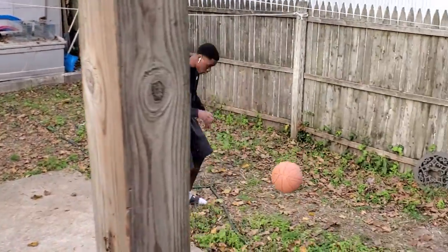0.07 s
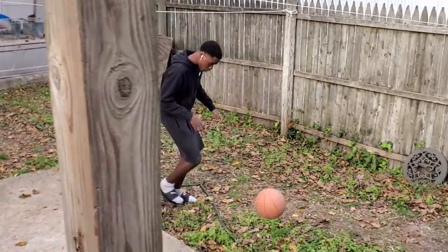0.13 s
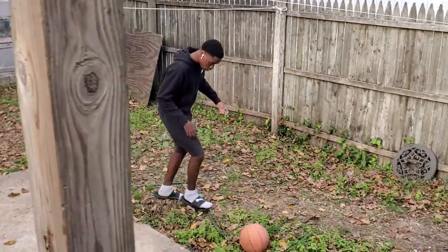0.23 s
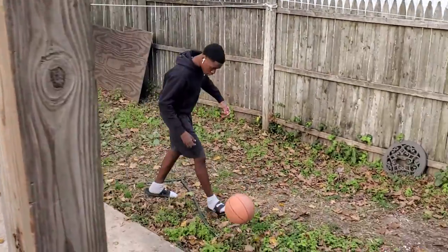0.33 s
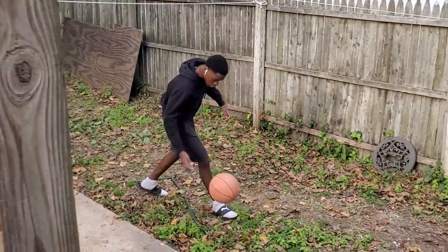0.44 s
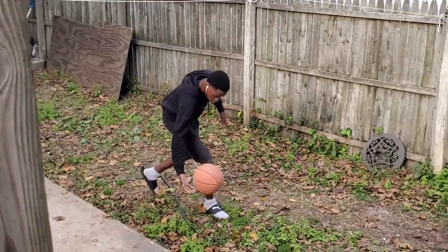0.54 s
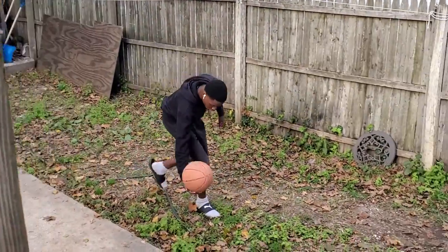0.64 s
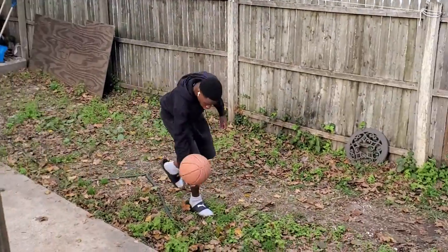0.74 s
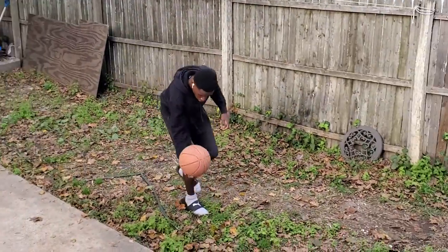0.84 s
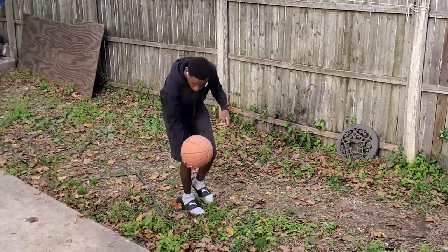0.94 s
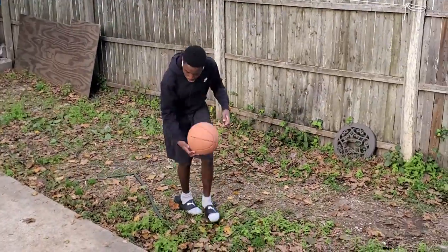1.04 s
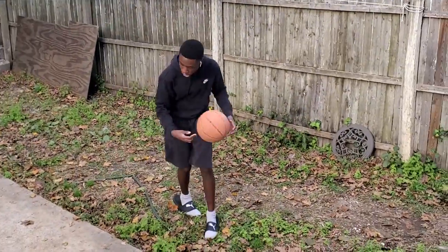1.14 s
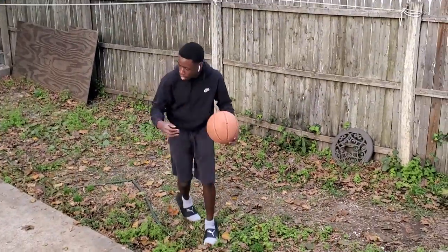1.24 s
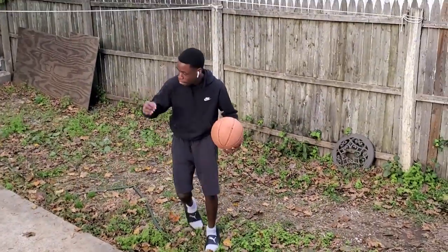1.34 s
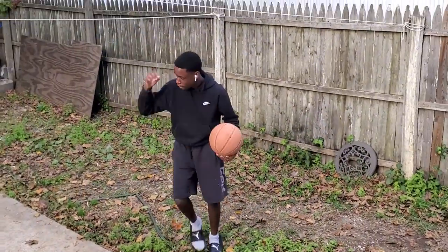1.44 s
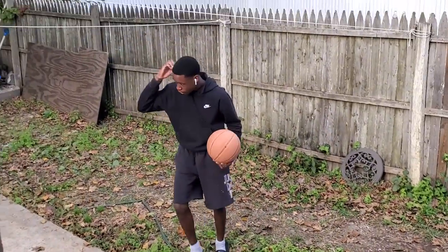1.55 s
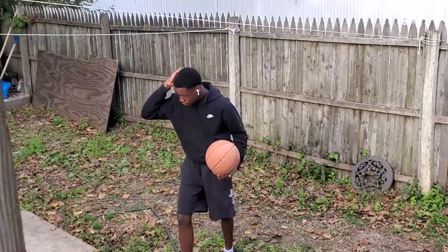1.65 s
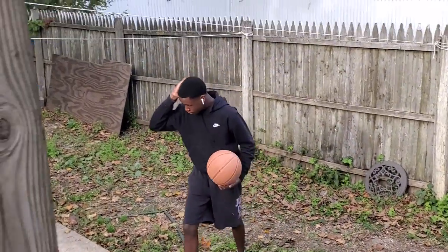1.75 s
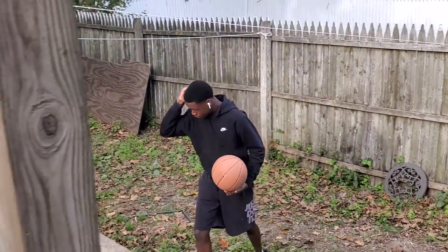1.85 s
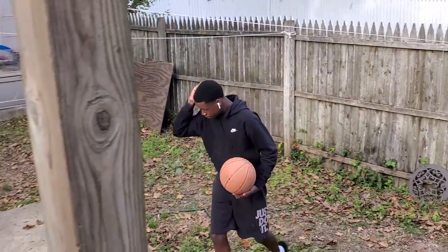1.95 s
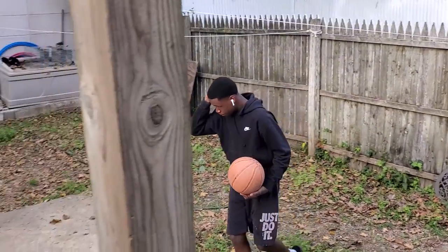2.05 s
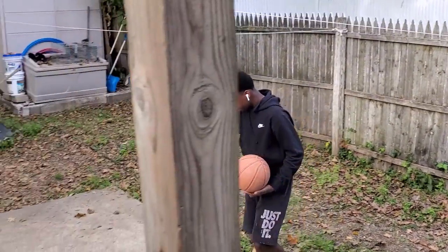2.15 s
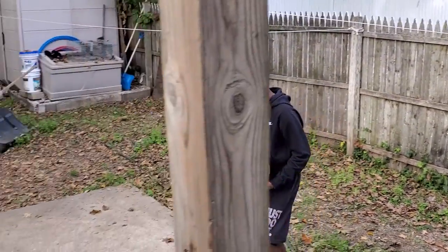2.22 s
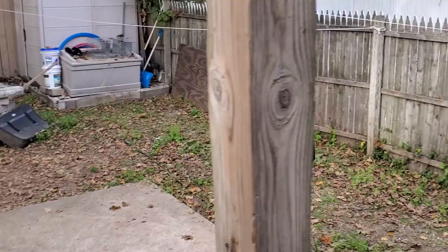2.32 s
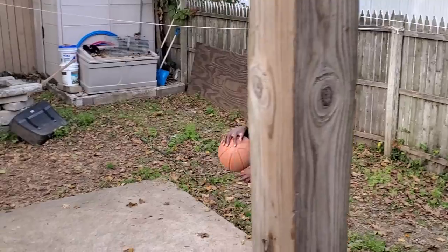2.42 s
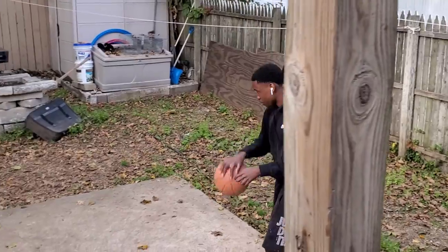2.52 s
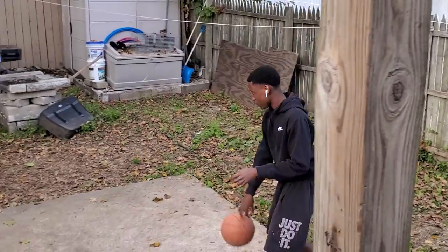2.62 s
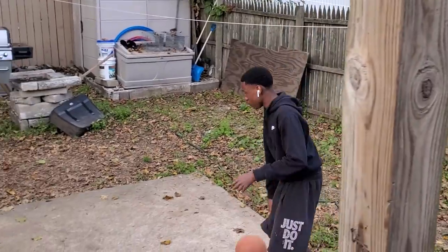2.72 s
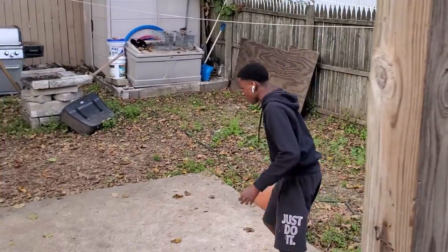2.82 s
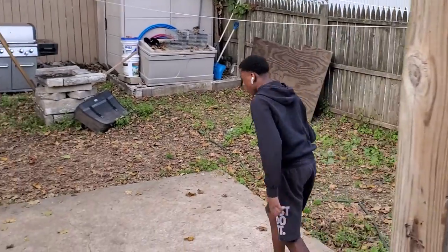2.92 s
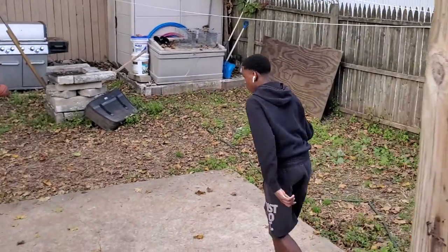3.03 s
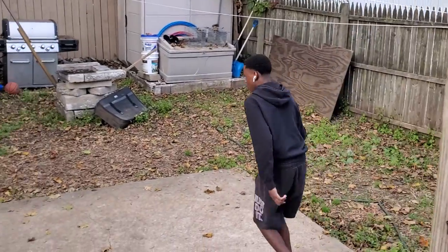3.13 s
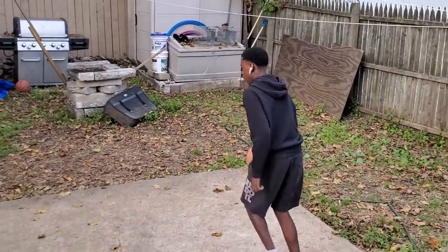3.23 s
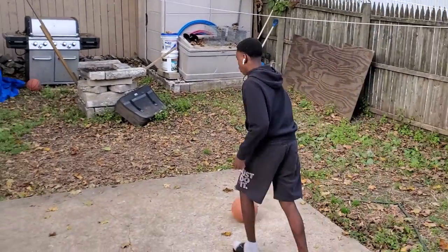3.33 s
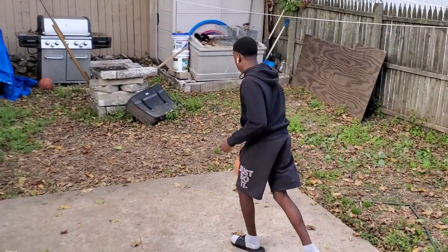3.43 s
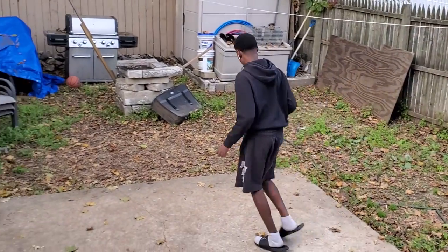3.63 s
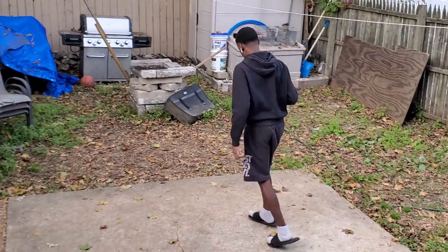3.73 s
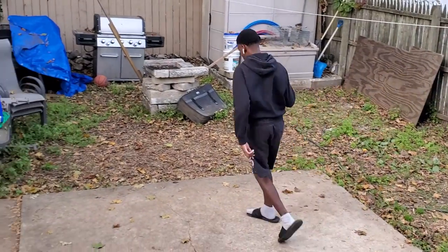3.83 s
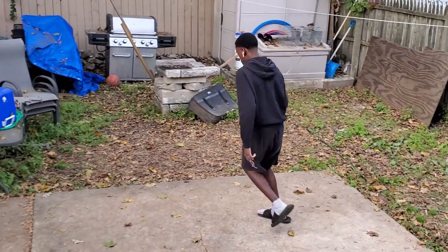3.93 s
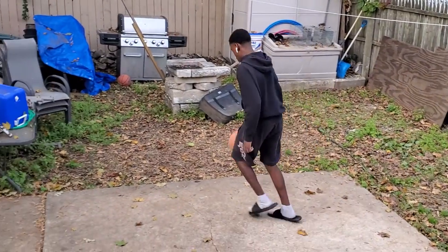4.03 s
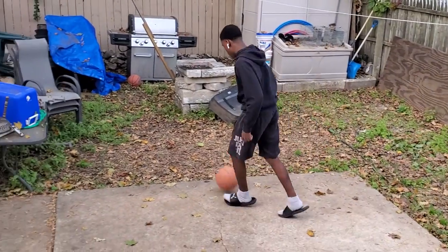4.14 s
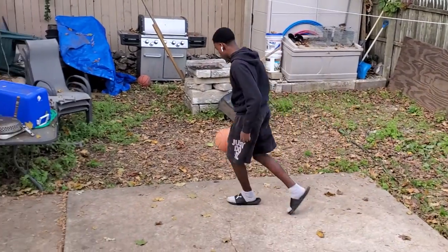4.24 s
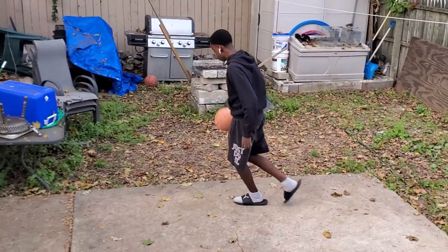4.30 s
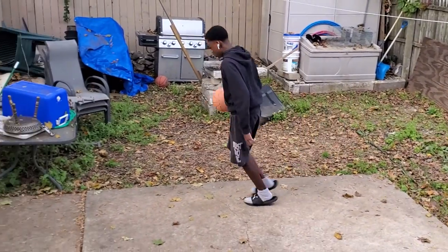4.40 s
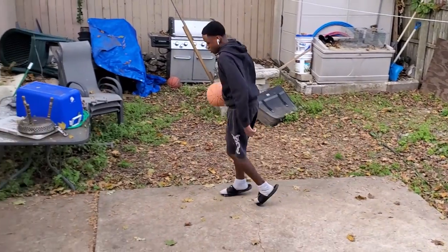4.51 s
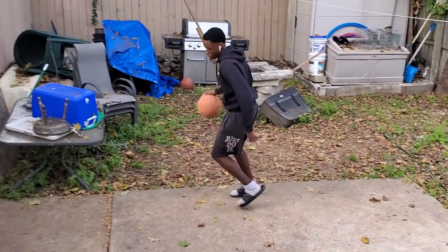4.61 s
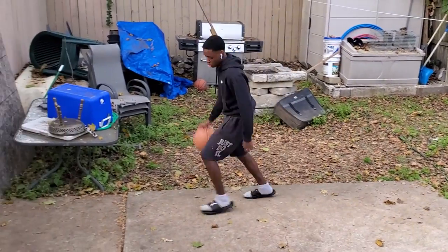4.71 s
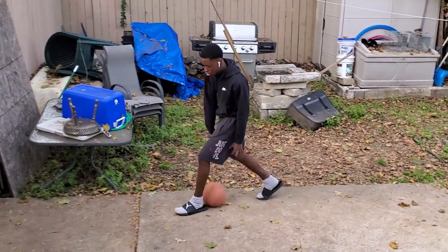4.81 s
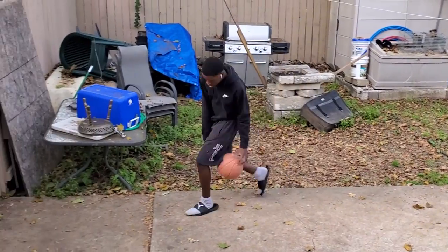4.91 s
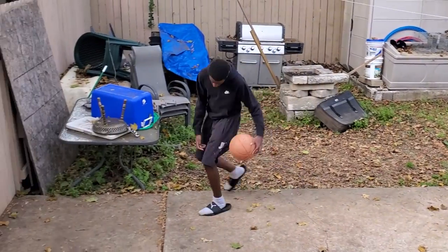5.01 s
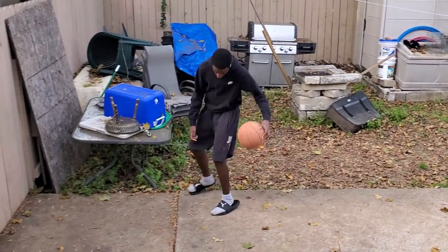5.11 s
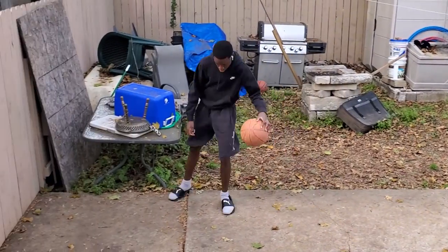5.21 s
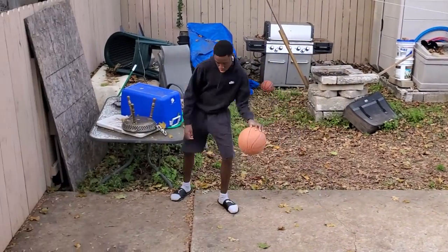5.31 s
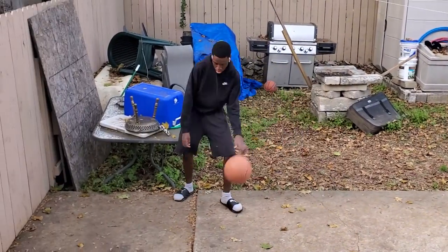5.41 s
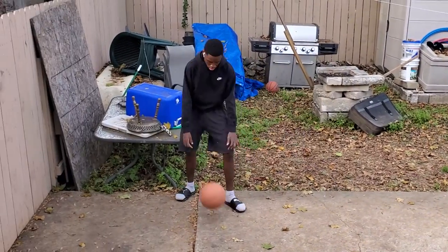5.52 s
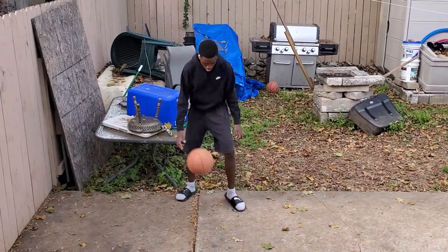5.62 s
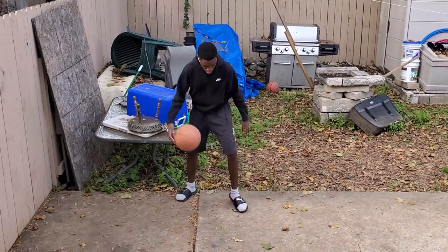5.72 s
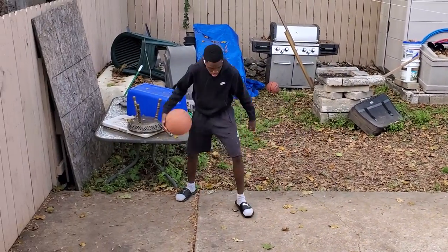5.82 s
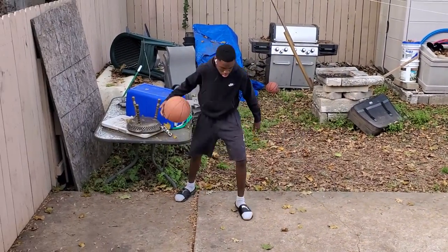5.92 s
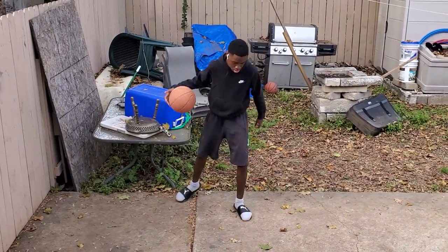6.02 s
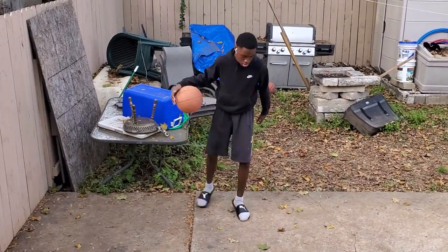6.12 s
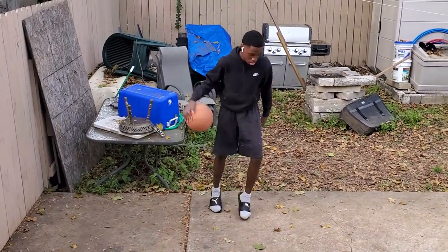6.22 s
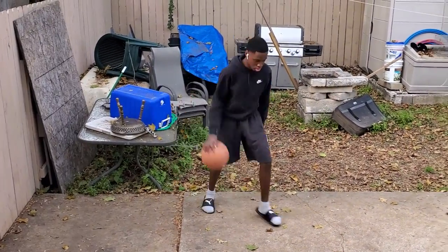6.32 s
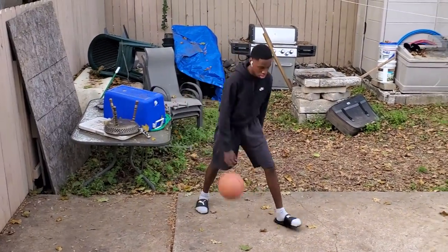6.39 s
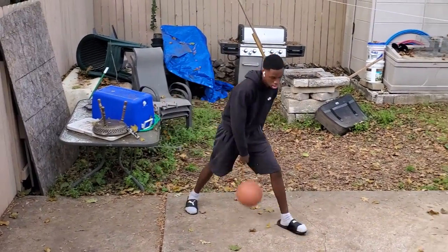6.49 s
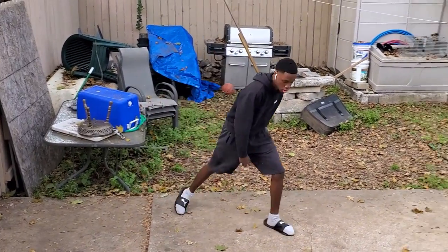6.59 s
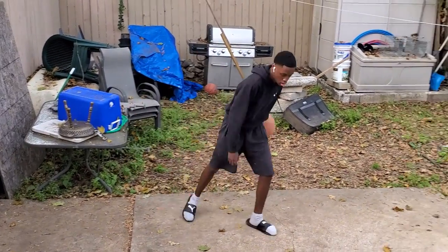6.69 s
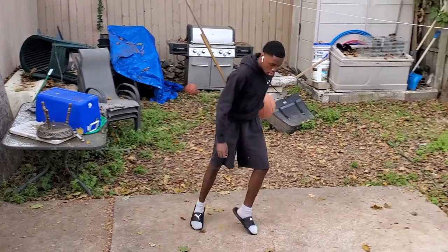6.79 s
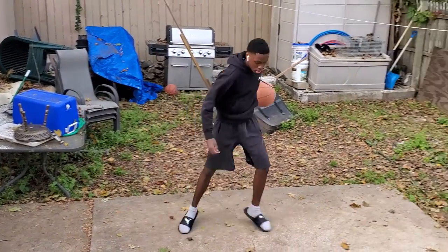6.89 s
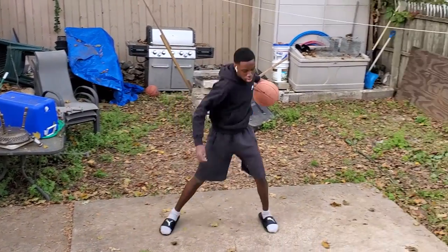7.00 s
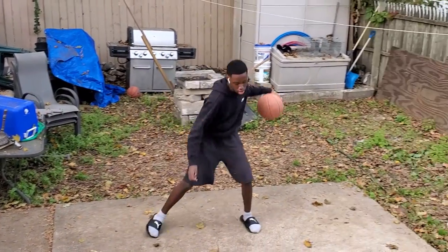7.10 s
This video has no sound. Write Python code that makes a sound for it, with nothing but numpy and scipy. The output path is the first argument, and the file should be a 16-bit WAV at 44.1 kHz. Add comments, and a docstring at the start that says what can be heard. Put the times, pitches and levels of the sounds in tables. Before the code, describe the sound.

Sandals crunch through dry leaves, then a basketball is dribbled six times on a concrete backyard patio, with faint traffic far away.

```python
"""A fenced backyard, a pair of microphones close to a basketball player, traffic rumbling far away.
First sandals crunch through dry leaves on the lawn, where the ball lands once, dully, and is fetched.
From about three seconds it is dribbled six times on the concrete patio, sandals scuffing in between.
Each bounce is a slap, a low thump and the ring of the air inside the ball, thrown back by the fence
and the house walls."""
import sys
import numpy as np
from scipy import signal
from scipy.fft import rfft, irfft
from scipy.io import wavfile

SR = 44100
rng = np.random.default_rng(int(sys.argv[2]) if len(sys.argv) > 2 else 0)


def bounce(signal):
    """Save signal as a 16-bit WAV file at the path given by the first command-line argument."""
    frames = np.transpose(np.atleast_2d(signal))
    limited = np.clip(frames, -1, 1)
    pcm = np.round(limited * 32767).astype(np.int16)
    wavfile.write(sys.argv[1], SR, pcm)


N = 315315
TIME = np.arange(N) / SR
AGE = np.arange(SR) / SR  # seconds since a contact

# Spectrum of cracking leaves, twigs and grit. Each row: frequency in Hz, level in dB.
GRIT_SPECTRUM = [(200, -26), (600, -13.5), (1100, -4), (2000, 1), (3000, -2.5), (4200, 7), (5300, 7),
                 (6300, 1), (7300, 4), (9500, -2), (12000, 4), (14500, 6.5), (16000, 2)]


def from_db(db):
    """Decibels to gain."""
    return 10 ** (np.asarray(db) / 20)


def rms_one(x):
    """Scale to rms 1."""
    return x / np.sqrt(np.mean(x ** 2) + 1e-20)


def fade(t60, age=AGE):
    """Exponential decay, 60 dB in t60 seconds."""
    return np.exp(-np.log(1000) * np.maximum(age, 0) / t60)


def waver(per_s):
    """A random drift of spread about 1, with per_s new values a second."""
    knots = rng.standard_normal(200)
    return np.interp(TIME * per_s, np.arange(len(knots)), knots)


def at_hz(points, hz):
    """Read a table on a log-frequency axis."""
    f, value = np.transpose(points)
    return np.interp(np.log(np.maximum(hz, 1)), np.log(f), value)


def passband(x, hz, kind, order=2):
    """Butterworth filter."""
    return signal.sosfilt(signal.butter(order, hz, kind, fs=SR, output="sos"), x + 1e-18)


def colour(x, spectrum, size=8192):
    """Causal (minimum-phase) filter with this spectrum; white noise keeps its power."""
    gain = rms_one(from_db(at_hz(spectrum, np.fft.rfftfreq(size, 1 / SR))))
    cepstrum = irfft(np.log(gain))
    cepstrum[1:size // 2] *= 2
    cepstrum[size // 2 + 1:] = 0
    impulse = irfft(np.exp(rfft(cepstrum)))
    return signal.fftconvolve(x, impulse[None], axes=1)[:, :x.shape[1]]


def pair_noise(apart, size=SR):
    """White noise at the two microphones; apart is the unshared part of the power."""
    return np.sqrt(1 - apart) * rng.standard_normal(size) + np.sqrt(apart) * rng.standard_normal((2, size))


def burst(t60, apart):
    """A short contact noise of unit energy."""
    noise = pair_noise(apart) * fade(t60)
    return noise / np.sqrt(np.sum(noise ** 2) / 2)


def add(out, s, sound):
    """Mix a sound in at s seconds."""
    start = min(max(round(s * SR), 0), out.shape[1])
    part = sound[..., :out.shape[1] - start]
    out[:, start:start + part.shape[-1]] += part


def aimed(sound, s, pan_db=0):
    """From where the player is at time s, sound reaches the right microphone a little after the left."""
    # The path from lawn to patio. Each row: time in seconds, lead of the left microphone in ms.
    left_lead = [(2.2, .46), (2.8, .19), (4.3, .2), (5.3, .02), (6.6, .22)]
    lag = round(np.interp(s, *np.transpose(left_lead)) * SR / 1000)
    left, right = sound * from_db([[pan_db / 2], [-pan_db / 2]])
    return np.array([left, np.pad(right, (lag, 0))[:len(right)]])


def neighbourhood():
    """Far traffic and air: the swelling rumble is shared, the wavering hiss differs at each microphone."""
    # Course of the rumble and of the hiss. Each row: time in seconds, level in dB.
    rumble_levels = [(0.0, -55.5), (0.52, -51.5), (1.65, -56), (2.85, -54.5), (6.83, -48.5), (7.15, -58)]
    hiss_levels = [(0, 2.5), (1, -1), (2, 1.5), (3.3, -1), (4.55, -2.5), (5.55, 2.5), (6, 0.5), (6.55, -1),
                   (7.15, 2)]
    # Spectra of the rumble and of the open air. Each row: frequency in Hz, level in dB.
    rumble_spectrum = [(20, -21), (32, -9.5), (48, 5.5), (70, 4), (100, -4.5), (135, -14.5), (200, -19.5),
                       (500, -53)]
    air_spectrum = [(88, -15.5), (150, 0.5), (264, 0), (348, -3.5), (466, -12), (821, -7), (1450, -17),
                    (1790, -12.5), (2870, -17.5), (4950, -14.5), (6020, -18.5), (9440, -23.5),
                    (15100, -17.5), (16000, -19)]
    swell = from_db(np.interp(TIME, *np.transpose(rumble_levels)) + 2.5)
    rumble = swell * colour(pair_noise(0.014, size=N), rumble_spectrum)
    low_air = passband(pair_noise(0.18, size=N), 333, "low", order=1)
    hiss = passband(pair_noise(1.0, size=N), 430, "high", order=1)
    hiss *= from_db(np.interp(TIME, *np.transpose(hiss_levels)))
    return rumble + from_db(-54) * colour(low_air + hiss, air_spectrum)


def far_wash(left_lead_s=.00045):
    """A soft wash of far traffic swells and sinks at random and reaches the left microphone first."""
    left, right = rms_one(passband(pair_noise(0.21, size=N), (830, 1500), "band"))
    swell = from_db(-58.5 + 4.5 * waver(per_s=2.53))
    return swell * np.array([left, np.roll(right, round(left_lead_s * SR))])


def far_tones(length_s=.25, width_hz=95):
    """Faint distant tones, blurred by their many paths between the houses."""
    # The glides. Each row: start in seconds, first pitch in Hz, last pitch in Hz, level in dB.
    glides = [(0.097, 1344, 1330, -63.5), (0.781, 1186, 1074, -57.5), (5.475, 1240, 1225, -58),
              (6.04, 1346, 1457, -59.5)]
    out = np.zeros((2, N))
    progress = np.minimum(AGE / length_s, 1)
    arch = np.sqrt(np.abs(np.sin(np.pi * progress)))
    for s, start_hz, end_hz, db in glides:
        phase = 2 * np.pi * np.cumsum(start_hz + (end_hz - start_hz) * progress) / SR
        blurred = rms_one(passband(pair_noise(0.95), width_hz, "low") * np.sin(phase))
        add(out, s, from_db(db) * blurred * arch)
    return out


def boom(hz=86.7):
    """The bass of a bounce builds up and rolls on between the houses."""
    bass = rms_one(passband(pair_noise(0.015), [hz / 1.6, hz * 1.14], "band"))
    return bass * fade(1.23) * (1 - fade(0.26))


def yard_tail(build_s, apart_hz):
    """Scatter off fence and clutter: builds, dies band by band, alike at both microphones in the bass."""
    # Decay of the yard. Each row: frequency in Hz, t60 in seconds.
    decay_times = [(60, 0.43), (150, 0.44), (400, 0.22), (1000, 0.4), (2500, 0.33), (5000, 0.36),
                   (9000, 0.16), (15000, 0.13)]
    # Spectrum of the scatter. Each row: frequency in Hz, level in dB.
    yard_spectrum = [(45, 1.5), (75, 16), (120, 3), (240, 0), (330, 0.5), (480, -5.5), (750, -1.5),
                     (1200, -6.5), (1550, -9), (2000, -5), (3500, -11.5), (4900, -13), (8500, -17.5),
                     (16000, -19.5)]
    out = np.zeros((2, SR))
    edges = np.geomspace(30, 17000, 16)
    for low, high in zip(edges, edges[1:]):
        hz = np.sqrt(low * high)
        noise = pair_noise(apart=hz ** 2 / (hz ** 2 + apart_hz ** 2))
        out += passband(noise, [low, high], "band") * fade(at_hz(decay_times, hz))
    return colour(out * (1 - np.exp(-AGE / build_s)), yard_spectrum)


def crunch(rise, length, t60, weight_db, sizzle_db, grains_per_s=5500, rub_db=-3):
    """Leaves and sand crack under a rubbing sole; a heavy step sounds lower, a dry one sizzles."""
    pressure = np.minimum(AGE / rise, 1) * fade(t60, AGE - length)
    sizes = from_db(3.6 * np.minimum(rng.exponential(1, SR), 4.5))
    clumps = from_db(2.5 * waver(per_s=110)[:SR])  # leaves and grains give way in small groups
    cracks = rng.random(SR) < grains_per_s / SR
    grains = rms_one(cracks * sizes * clumps * pair_noise(0.89))
    noise = rms_one(grains + from_db(rub_db) * pair_noise(0.97)) * pressure
    hz = np.geomspace(200, 16000, 90)
    ripple_db = rng.normal(0, 2.7, len(hz))  # each crunch gets its own random, uneven tone colour
    shelves_db = weight_db / (1 + (hz / 3000) ** 2) + sizzle_db / (1 + (10000 / hz) ** 6)
    tone_db = at_hz(GRIT_SPECTRUM, hz) + ripple_db + shelves_db
    return colour(noise, np.column_stack([hz, tone_db]))


def footwork(settle_s=0.4):
    """Sandals swell softly in the leaves and bite quickly on the slab; twigs snap, loose bits settle."""
    # Steps in dry leaves. Each row: start and length in seconds, level and sizzle in dB.
    leaf_steps = [(0.046, 0.029, -43.5, 0), (0.351, 0.084, -35, 2.5), (0.498, 0.17, -43, 0),
                  (1.136, 0.051, -46.5, -1), (1.239, 0.14, -41.5, 4), (1.776, 0.09, -49.5, 5.5),
                  (2.097, 0.11, -36, 5.5), (2.375, 0.091, -30.5, 5.5), (2.558, 0.021, -32.5, 2)]
    # Landings and scuffs. Each row: start, rise and length in seconds, level, weight and sizzle in dB.
    scuffs = [(1.181, 0.0016, 0.0045, -33.5, 4, 2), (1.683, 0.0027, 0.013, -46.5, 18, -5),
              (2.742, .006, .008, -41, -3, -5), (3.112, 0.0089, 0.033, -36, 5, 0),
              (3.429, 0.011, 0.011, -32, -5, 1.5), (3.525, 0.02, 0.039, -30.5, -14, 4),
              (3.958, 0.0046, 0.0054, -34, 8, 1.5), (4.119, .002, .004, -45, -25, -12),
              (4.647, 0.018, 0.052, -34.5, 6, -9), (4.869, 0.057, .1, -37, 19, 10.5),
              (4.928, 0.0069, 0.031, -24, 16, -3), (5.261, 0.0023, 0.02, -35, -10, -22),
              (5.333, 0.045, 0.054, -27, 14, -2), (5.47, .01, 0.19, -56, 8, 0),
              (6.177, 0.0024, .008, -46.5, 13, 0), (6.337, 0.011, 0.045, -36.5, 20, 5.5),
              (6.578, 0.01, 0.051, -36, 12, 6.5), (6.831, 0.028, 0.17, -34.5, 4.5, 0.5),
              (7.091, 0.017, 0.026, -25.5, -1.5, -4)]
    # The loudest snaps of twigs and grit. Each row: start in seconds, level in dB.
    snaps = [(0.6644, -15), (0.792, -21), (0.899, -24), (1.367, -25), (5.265, -12), (5.6695, 2.5),
             (6.8959, -12), (6.9217, -5)]
    out = np.zeros((2, N))
    for s, length, db, sizzle_db in leaf_steps:  # a longer step swells and dies more slowly
        step = crunch(.5 * length, length, t60=0.18 + 2.94 * length, weight_db=9, sizzle_db=sizzle_db)
        add(out, s, aimed(from_db(db) * step, s, pan_db=-1.5))
    for s, rise, length, db, weight_db, sizzle_db in scuffs:
        step = crunch(rise, length, 0.17 + 1.25 * length, weight_db, sizzle_db)
        add(out, s, aimed(from_db(db) * step, s, pan_db=-1.0))
    for s, db in snaps:
        snap = colour(burst(t60=0.0094, apart=0.41), GRIT_SPECTRUM)
        add(out, s, aimed(from_db(db) * snap, s))
    for s, *_ in leaf_steps + scuffs:  # disturbed leaves and grit settle with tiny ticks
        for delay in rng.uniform(0, settle_s, size=3):
            tick_db = rng.normal(-31.5, 1.4)
            tick = colour(burst(t60=0.0055, apart=0.73), GRIT_SPECTRUM)
            add(out, s + delay, aimed(from_db(tick_db) * tick, s))
    return out


def thump(hz, t60, rise):
    """The ball squashes and springs back: a few heavily damped cycles."""
    return np.sin(2 * np.pi * hz * AGE) * fade(t60) * (1 - np.exp(-AGE / rise)) * np.ones((2, 1))


def ball_ring():
    """Every contact excites the modes of the enclosed air with new strengths."""
    # Air modes of the ball. Each row: frequency in Hz, level in dB, t60 in seconds.
    air_modes = [(826, -6, 0.098), (1045, -15, 0.033), (1301, 6.5, 0.035), (1520, -32, 0.09),
                 (1834, -14, 0.26), (2270, -12, 0.047), (2740, -34, 0.79), (3510, -8, 0.06),
                 (4200, -37, .24), (4730, -34, 0.073), (4770, -21, 0.2)]
    out = np.zeros((2, SR))
    for hz, db, t60 in air_modes:
        phase = rng.uniform(0, 2 * np.pi) + rng.normal(0, .5, (2, 1))
        strength = from_db(db + rng.normal(0, 2.5))
        out += strength * np.sin(2 * np.pi * hz * AGE + phase) * fade(t60)
    return out


def shell_knock(shell_hz):
    """The rubber shell rattles briefly, most strongly near one pitch."""
    broad = passband(burst(t60=.12, apart=0.86), [650, 1450], "band")
    narrow = passband(burst(t60=0.14, apart=0.3), [shell_hz / 1.118, shell_hz * 1.02], "band")
    return broad + from_db(2) * narrow


def soft_contacts(lawn_s=.424):
    """The ball lands dully on leaves and earth and is patted by hand and foot."""
    # The bounce on the lawn: levels of thump, earth and crushed leaves in dB.
    lawn_levels = (-2.5, -23, -25)
    # Spectrum of a dull contact, as on earth. Each row: frequency in Hz, level in dB.
    dull_spectrum = [(60, 1.5), (150, -25), (210, -6), (370, 2), (520, -10.5), (850, -5), (1500, -15),
                     (3000, -38), (9000, -34)]
    # Soft touches on the ball. Each row: start in seconds, level in dB.
    pats = [(.32, -46.5), (.766, -45), (2.546, -40.5), (2.576, -41), (3.12, -44.5), (3.961, -47)]
    thump_db, earth_db, leaves_db = lawn_levels
    out = np.zeros((2, N))
    low = aimed(from_db(thump_db) * thump(hz=72, t60=0.059, rise=0.0039), lawn_s)
    add(out, lawn_s + 0.0037, low)
    add(out, lawn_s + 0.015, from_db(-6.5) * low)  # off the fence
    earth = colour(pair_noise(0.25) * fade(0.18) * (1 - fade(0.005)), dull_spectrum)
    add(out, lawn_s, aimed(from_db(earth_db) * earth, lawn_s))
    tail = passband(yard_tail(build_s=0.016, apart_hz=600), 130, "low")
    add(out, lawn_s, from_db(-28) * tail + from_db(-42.5) * boom())
    leaves = crunch(rise=0.014, length=0.019, t60=0.029, weight_db=16.5, sizzle_db=4)
    add(out, lawn_s - .011, aimed(from_db(leaves_db) * leaves, lawn_s))  # the leaves give way first
    for s, db in pats:
        pat = colour(pair_noise(0.31) * fade(0.088), dull_spectrum) + from_db(-4.5) * ball_ring()
        add(out, s, aimed(from_db(db) * pat, s))
    return out


def dribble(far_house_s=.13):
    """Rubber slaps the slab, the shell knocks, the air thumps and rings; wall and far house answer."""
    # Bounces on concrete. Each row: start in seconds, strength, hardness and knock in dB,
    # shell pitch in Hz, left over right in dB, delay of the wall echo in seconds.
    bounces = [(2.855, -17.5, 0.5, 1, 1230, 0.5, 0.014), (3.518, -17, -4.5, 1, 797, -1, 0.017),
               (4.298, -18.5, -2.5, -0.5, 1040, 1.5, .017), (4.9733, -20.5, -1, 5.5, 1020, 4, 0.017),
               (5.67, -23, -4, 0.5, 1450, -5.5, .018), (6.628, -20.5, 2, -1, 1370, 6.5, .016)]
    # Spectrum of rubber on concrete. Each row: frequency in Hz, level in dB.
    slap_spectrum = [(150, -5), (450, -2), (800, 0.5), (1300, -5.5), (1900, 8.5), (2700, -1), (3600, -13.5),
                     (4200, 4), (5200, 1), (6500, -7.5), (9000, -12), (16000, -23)]
    low = from_db(14.5) * thump(hz=76, t60=.062, rise=.002)
    hollow = thump(hz=190.6, t60=0.1, rise=0.011) - thump(hz=246.5, t60=0.088, rise=0.001)
    out = np.zeros((2, N))
    for s, db, hard_db, knock_db, shell_hz, pan_db, wall_s in bounces:
        slap = from_db(30.5 + hard_db) * colour(burst(t60=.004, apart=.25), slap_spectrum)
        knock = from_db(38 + knock_db) * shell_knock(shell_hz)
        ring = from_db(knock_db) * ball_ring()
        flattening = from_db(24.5 + hard_db) * colour(burst(t60=0.0035, apart=0.99), slap_spectrum)
        hit = np.zeros((2, SR))
        add(hit, 0, aimed(slap + knock + from_db(-1.5) * hollow + ring, s, pan_db))
        add(hit, .003, aimed(flattening, s))  # the shell flattens on the slab
        add(hit, .0045, aimed(low, s))
        # The wall throws slap and knock back with left and right swapped, then the thump.
        add(hit, wall_s, from_db(-16.5) * slap[::-1] + from_db(-14.0) * knock[::-1])
        add(hit, wall_s + 0.0032, from_db(-3.0) * low)
        add(hit, .004, yard_tail(build_s=0.00037, apart_hz=404) + from_db(-18) * boom())
        # The shell's note rings on between fence and wall.
        note = passband(burst(t60=0.22, apart=1.0), [shell_hz / 1.1, shell_hz * 1.12], "band")
        add(hit, wall_s, from_db(32.5 + knock_db) * note)
        # The thump and its wall echo both return from the far house.
        add(hit, far_house_s, from_db(-20) * low)
        add(hit, far_house_s + wall_s, from_db(-23) * low)
        bite = [(1300, 0.028), (1800, hard_db), (2600, hard_db), (3800, 0)]  # hard bounces bite at 2 kHz
        add(out, s, from_db(db) * colour(hit, bite))
    return out


def scene():
    """Ball and feet close by, the neighbourhood behind; the right microphone is a little louder."""
    player = dribble() + soft_contacts() + footwork()
    background = far_tones() + far_wash() + neighbourhood()
    return (player + background) * from_db([[-.4], [.4]])


def record(dry):
    """The recorder cuts the deepest bass, rounds the loudest peaks and cuts the top."""
    ceiling, cutoff_hz = 1.6, 16000
    rounded = ceiling * np.tanh(passband(dry, 23.0, "high", order=4) / ceiling)
    return signal.sosfilt(signal.ellip(10, .2, 80, cutoff_hz, fs=SR, output="sos"), rounded)


dry = scene()
out = record(dry)
bounce(out)
```